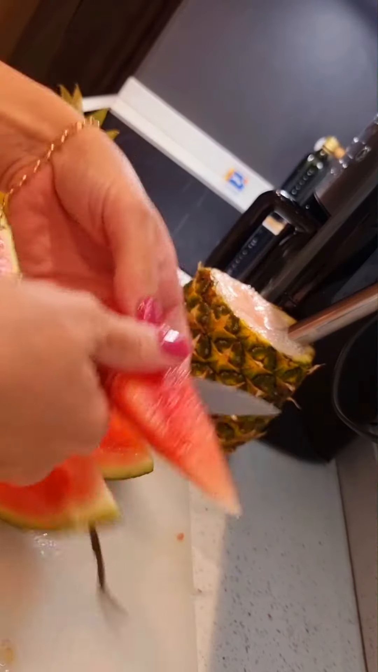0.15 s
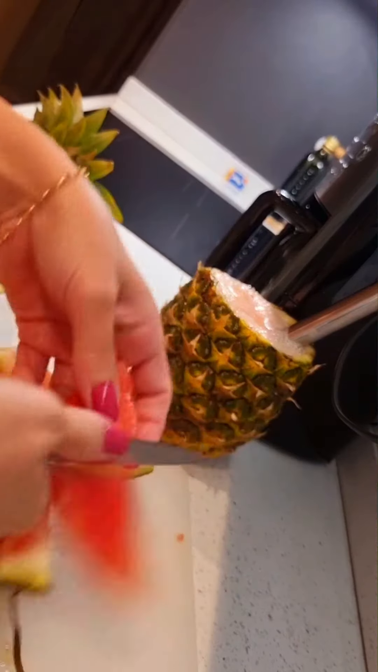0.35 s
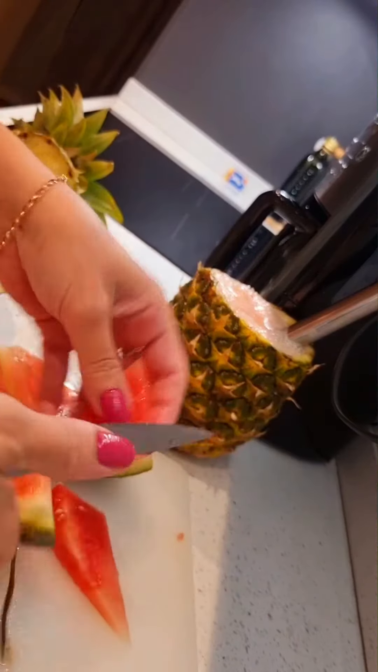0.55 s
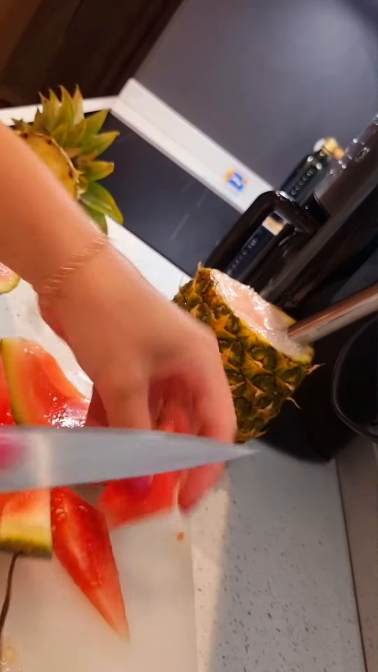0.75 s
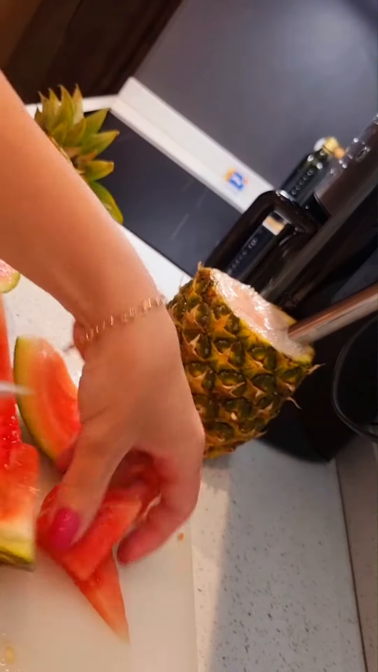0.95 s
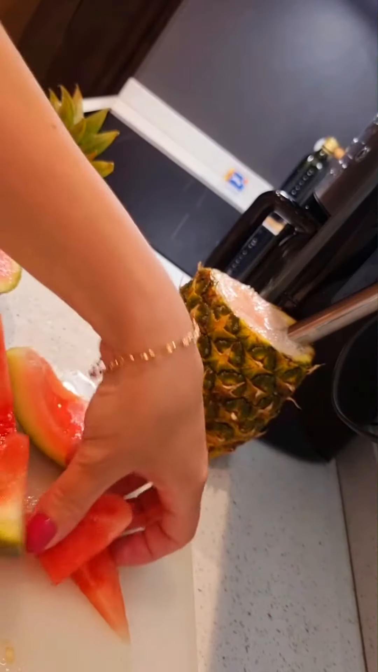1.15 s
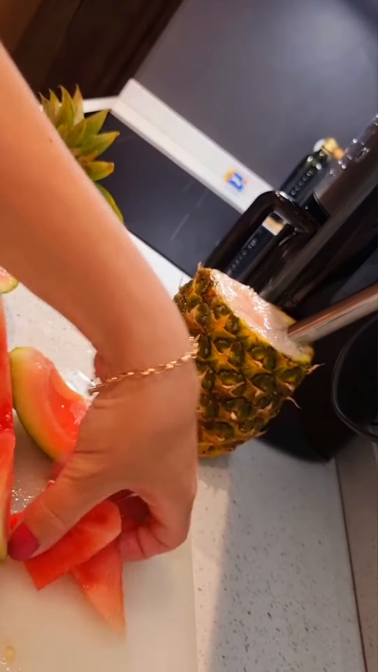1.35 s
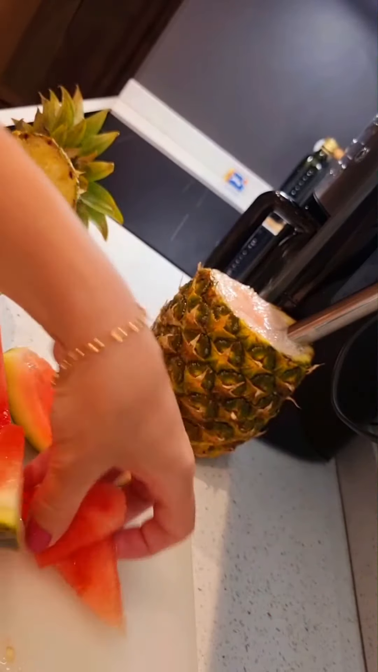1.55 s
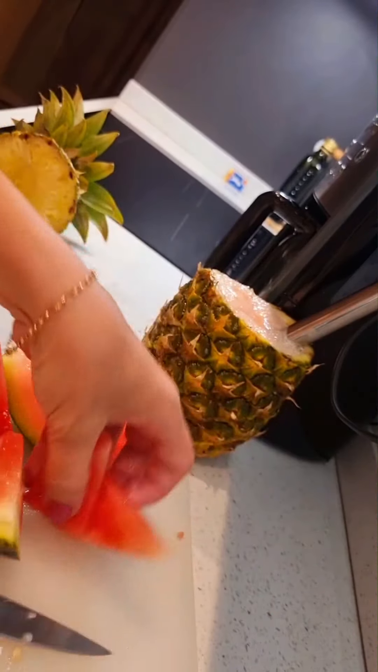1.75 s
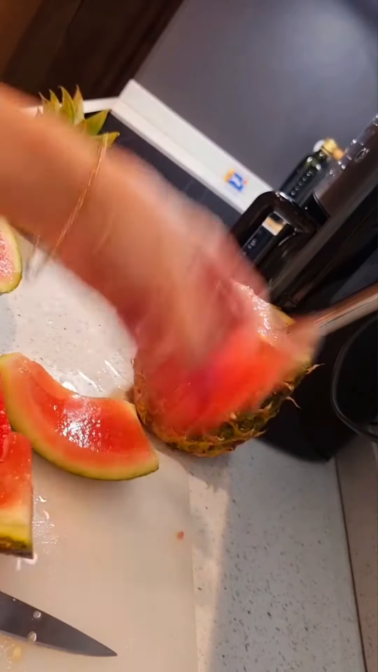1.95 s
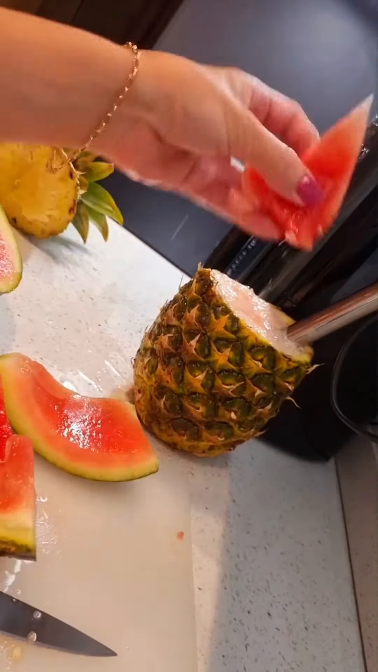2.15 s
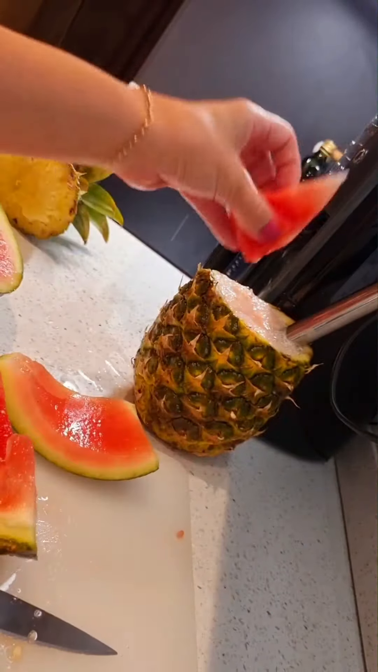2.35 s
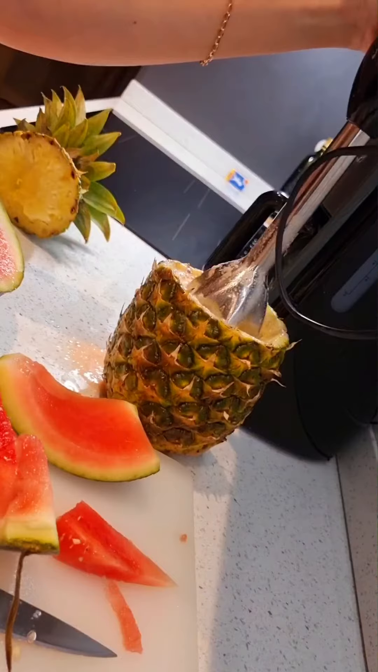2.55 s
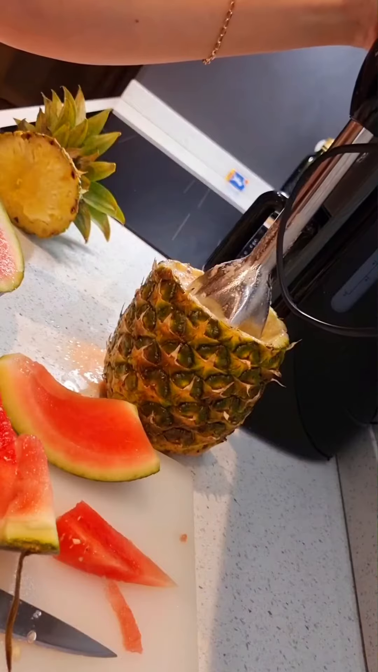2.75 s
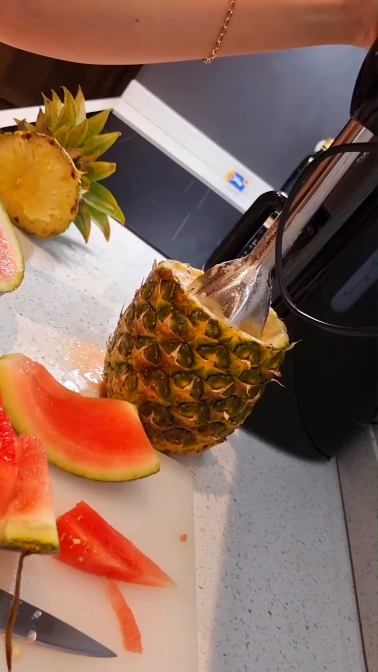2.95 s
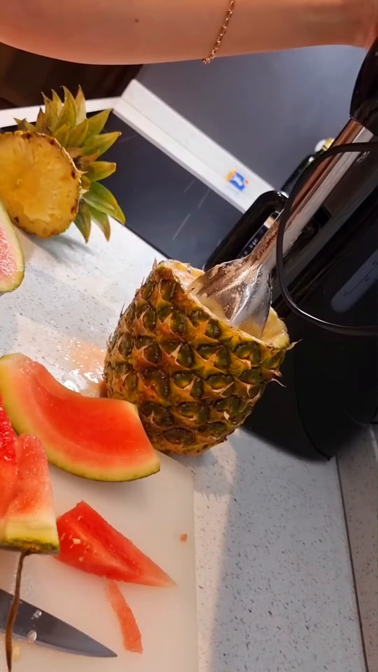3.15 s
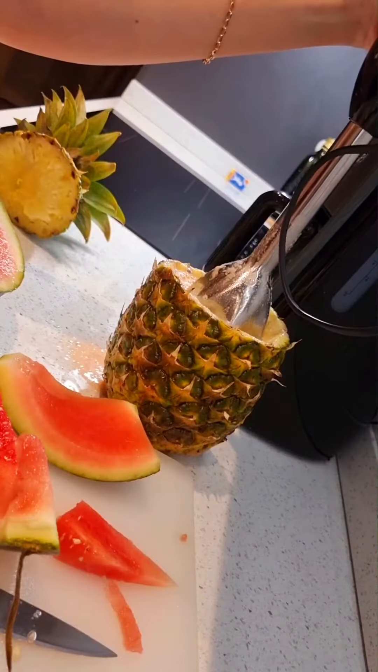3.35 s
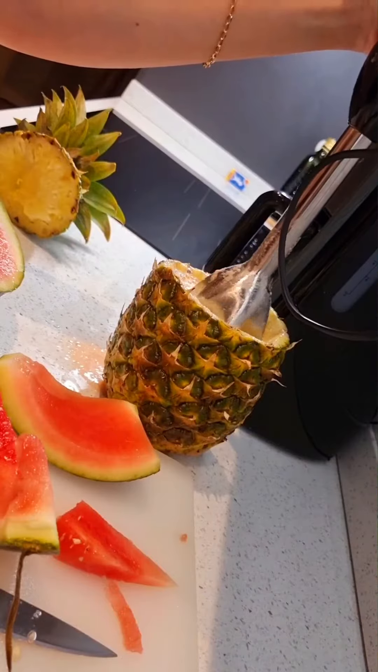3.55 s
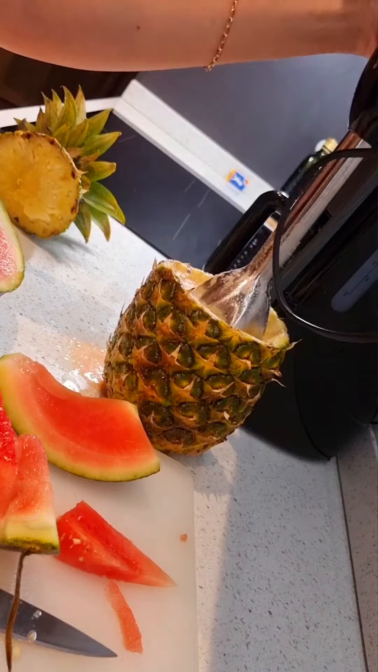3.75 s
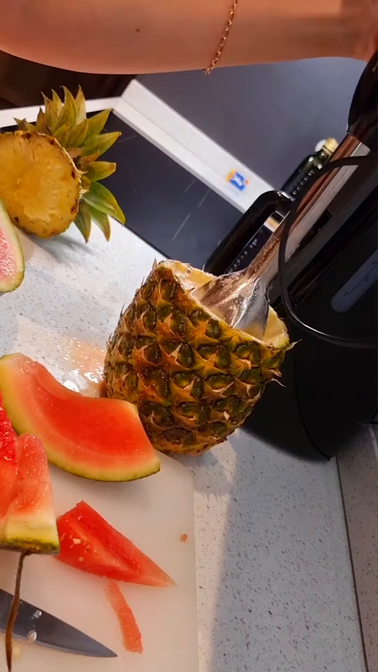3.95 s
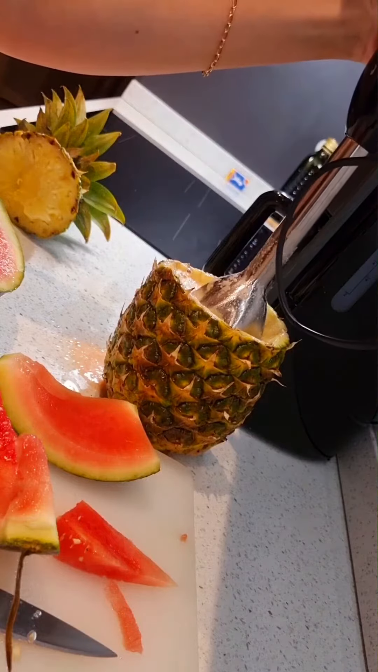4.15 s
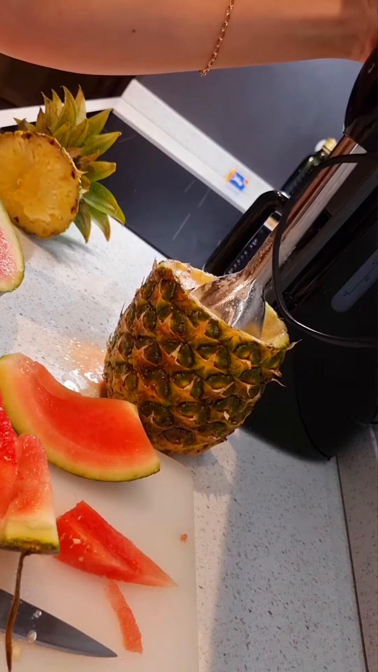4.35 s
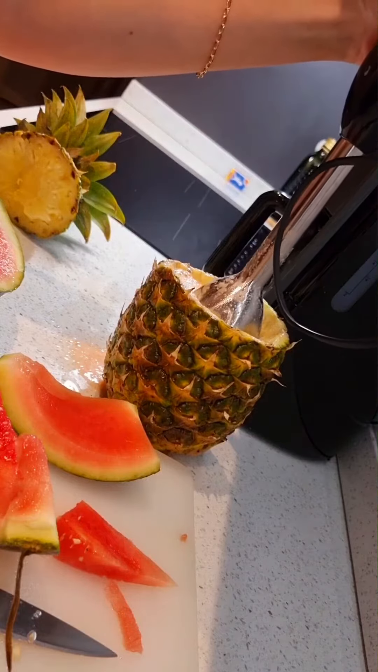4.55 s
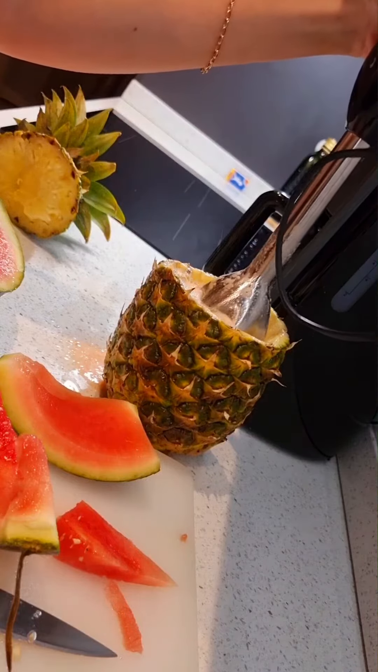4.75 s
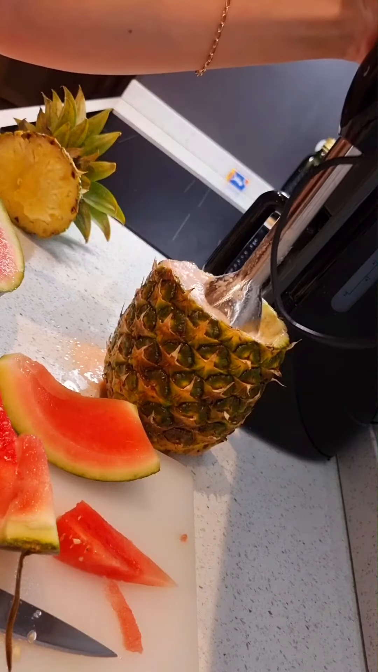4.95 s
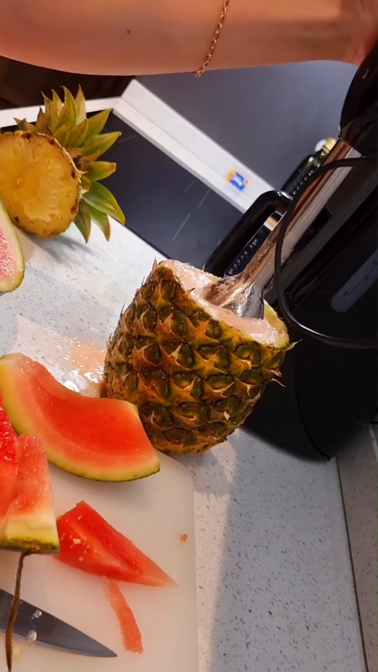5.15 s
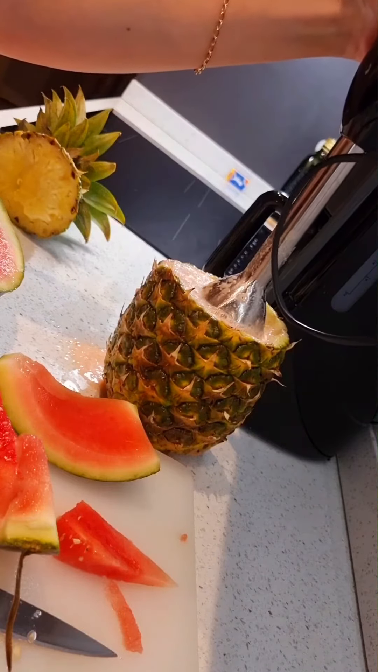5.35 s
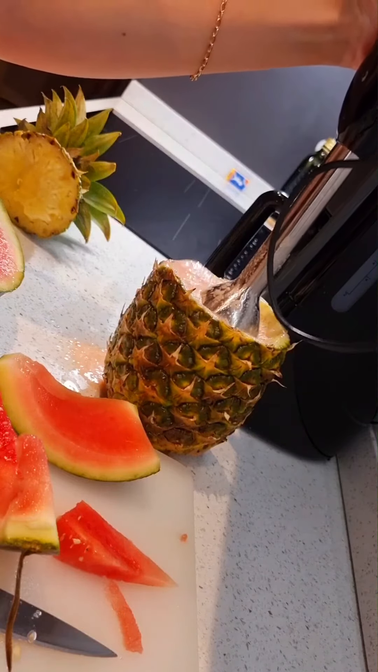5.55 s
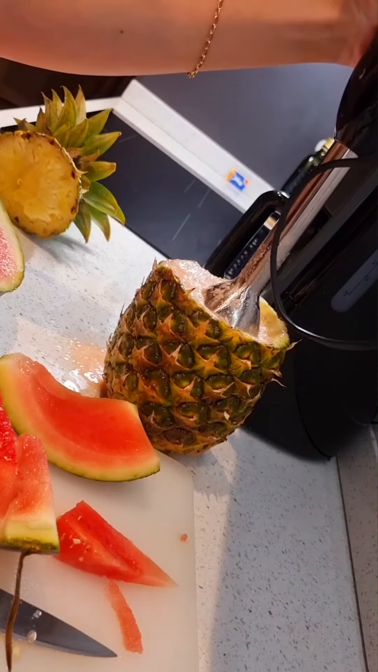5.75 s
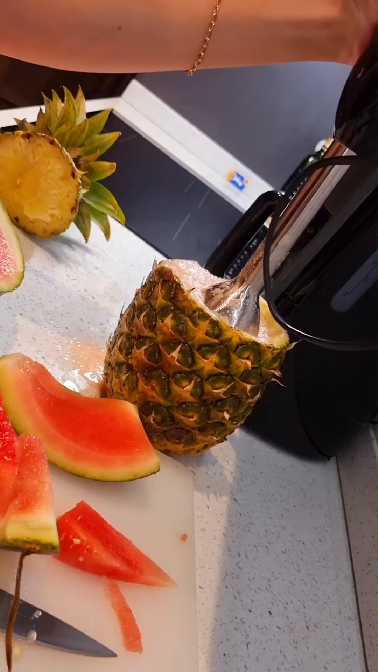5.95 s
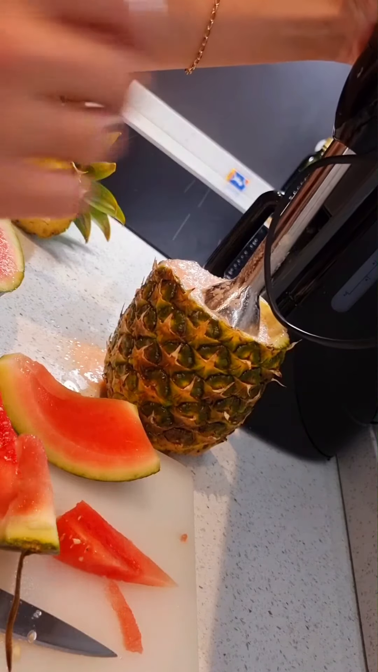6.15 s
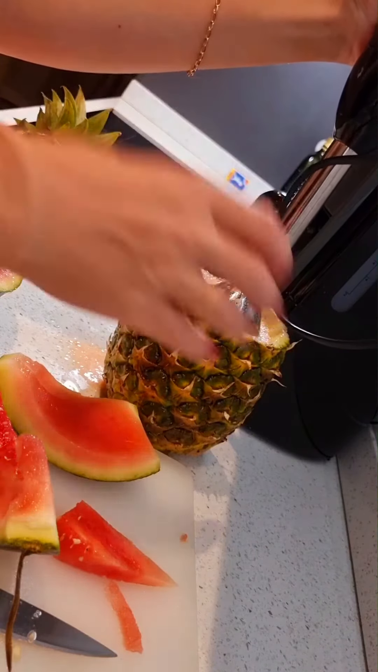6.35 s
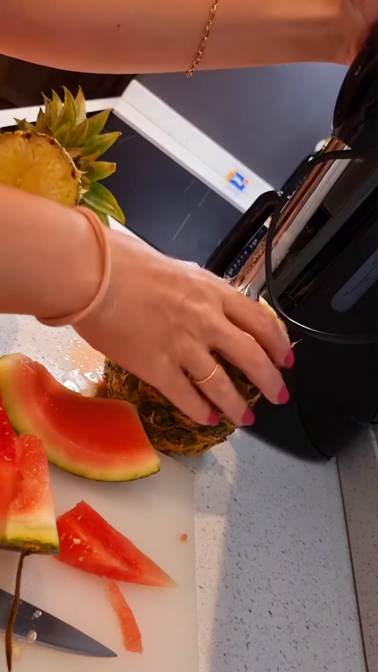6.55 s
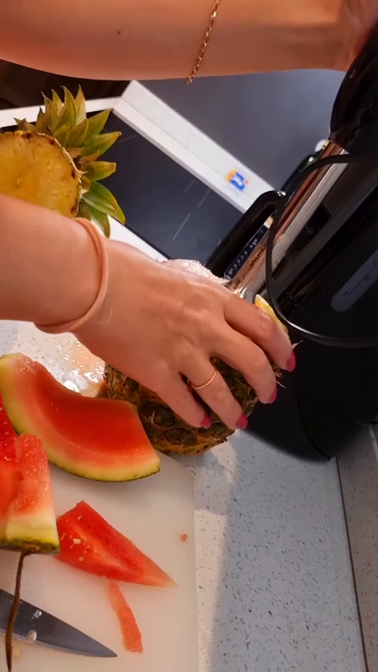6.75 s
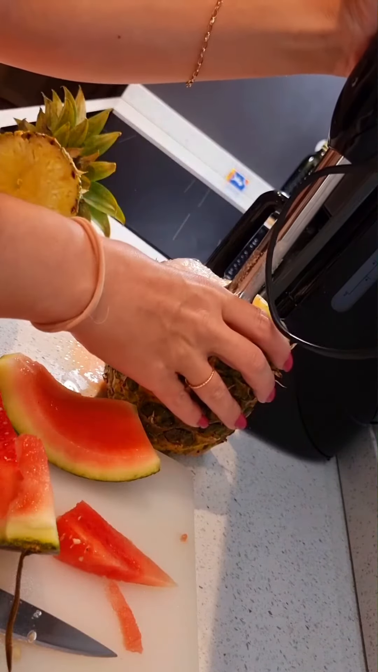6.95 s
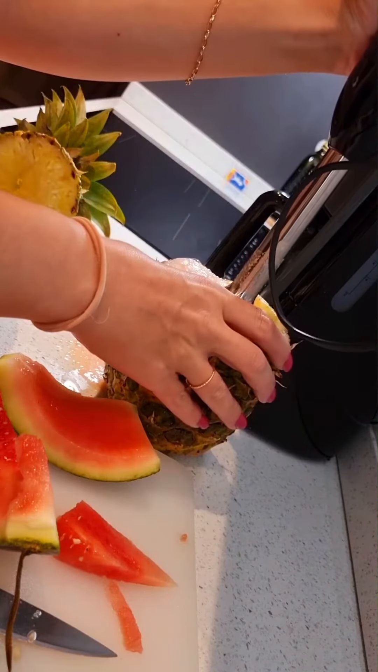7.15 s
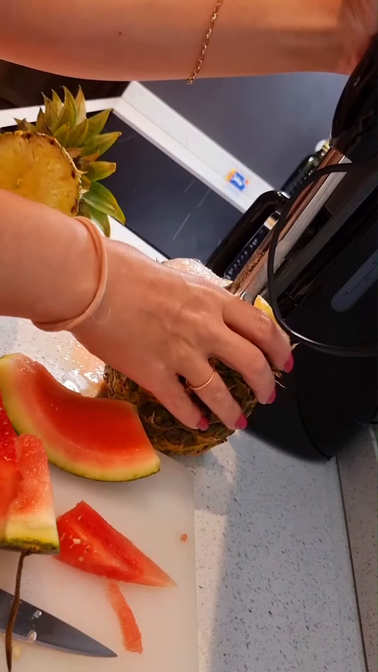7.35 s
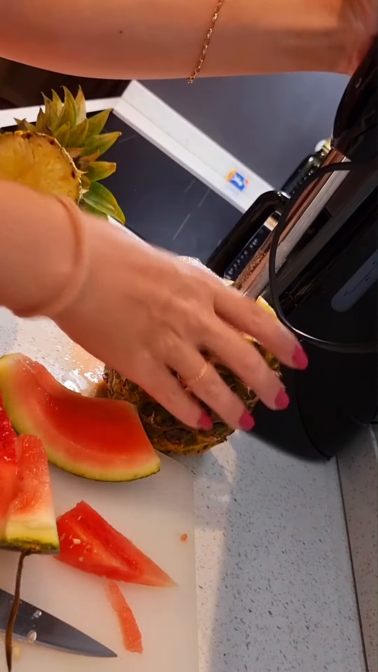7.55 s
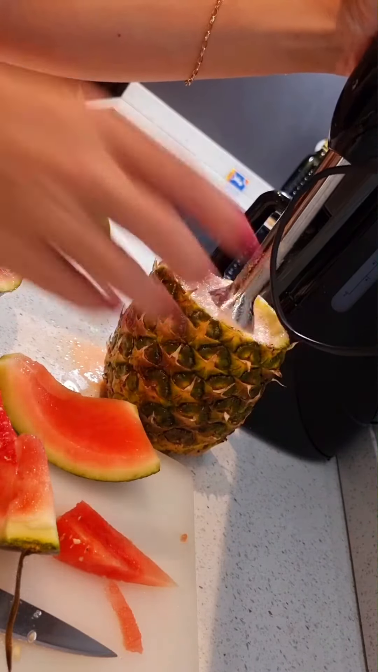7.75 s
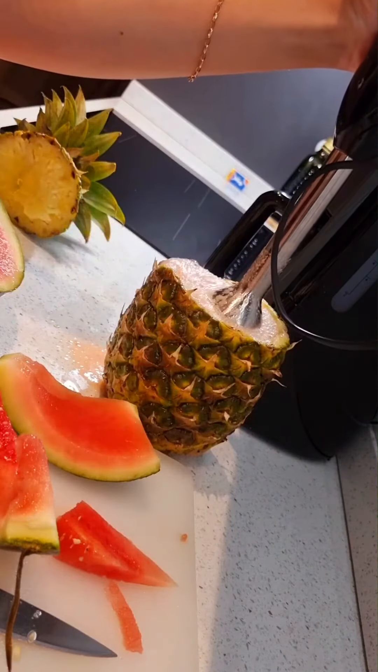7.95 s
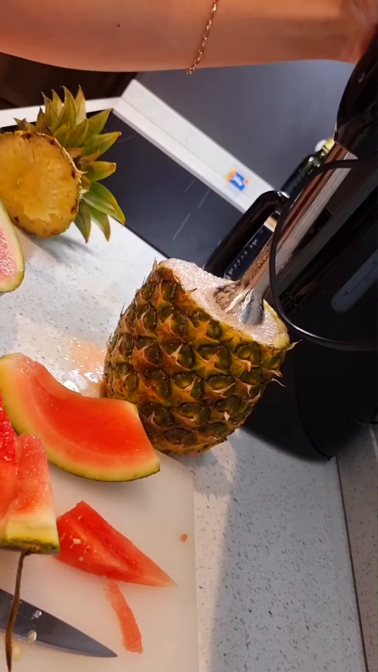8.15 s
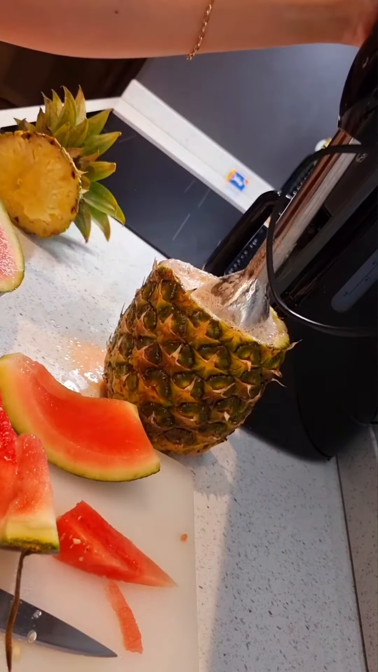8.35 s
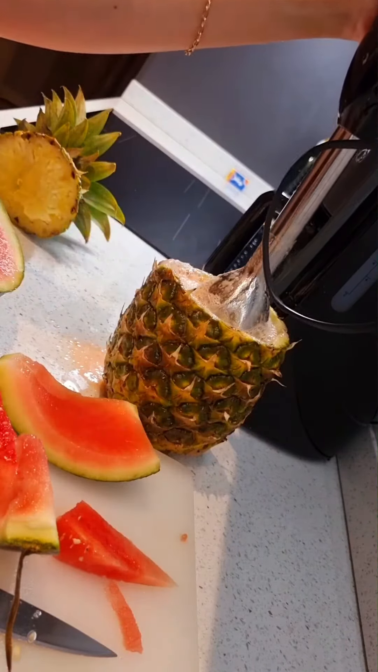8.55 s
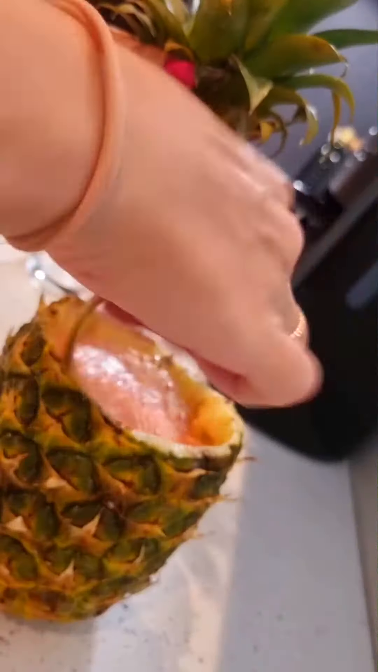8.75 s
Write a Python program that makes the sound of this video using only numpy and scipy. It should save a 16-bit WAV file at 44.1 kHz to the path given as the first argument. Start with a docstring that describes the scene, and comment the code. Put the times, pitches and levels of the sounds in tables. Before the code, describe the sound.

In a small kitchen with a faint low house hum, wet fruit crackles softly under fingers and blade. A knife drops on the board with a sharp clatter. After quiet handling, a hand blender whines up inside a hollow pineapple, bites noisily into chunks and coasts down. Three short wet bursts follow, then soft worktop bumps. Close stereo pickup, leaning left, with short room reflections.

```python
"""A knife slices fruit in a small kitchen while wet pieces crackle and knocks ring the board;
then the knife is put down with a clatter. A hand blender then starts inside a hollowed pineapple:
it hums and whines, bites into chunks, and coasts down as a ring rises in the closing hollow.
Three short bursts churn smooth pulp, and soft bumps on the worktop follow. Curves of rotor speed steer
the blender's sines and noises; blows set decaying tones ringing; the house hums faintly throughout."""
import sys
import numpy as np
from scipy import signal
from scipy.fft import rfft, irfft
from scipy.io import wavfile
from scipy.ndimage import uniform_filter1d

SR = 44100
rng = np.random.default_rng(int(sys.argv[2]) if len(sys.argv) > 2 else 0)


def file_out(sig):
    """Save sig as 16-bit WAV at sys.argv[1]."""
    # one column per channel
    cols = np.atleast_2d(sig).T
    # limit, then scale
    lim = np.clip(cols, -1, 1)
    pcm = np.round(lim * 32767).astype(np.int16)
    wavfile.write(sys.argv[1], SR, pcm)


N = 388080
TIME = np.arange(N) / SR

# when the blender's button is held: pressed_s, let_go_s
PRESSES = [(3.679, 5.109), (6.889, 7.129), (7.35, 7.695), (7.799, 7.947)]
# rotor speed without load, and the speed lost at full load (turns per second)
FREE_HZ, SAG_HZ = 231.4, 43


def from_db(db):
    """Turns decibels into a factor."""
    return 10 ** (np.asarray(db) / 20)


def rms_one(x):
    """Scales a sound to an average strength (rms) of 1."""
    return x / np.sqrt(np.mean(x ** 2) + 1e-20)


def in_time(rows):
    """The columns of a curve at every sample."""
    s, *columns = np.transpose(rows)
    return [np.interp(TIME, s, column) for column in columns]


def at_hz(points, hz):
    """Reads a curve over pitch, with pitch spaced as the ear hears it."""
    f, value = np.transpose(points)
    return np.interp(np.log(np.maximum(hz, 1)), np.log(f), value)


def band(x, low_hz, high_hz, order=2):
    """Keeps the pitches between two limits."""
    edges = [low_hz, min(high_hz, .45 * SR)]
    return signal.sosfilt(signal.butter(order, edges, "band", fs=SR, output="sos"), x + 1e-18)


def colour(x, spectrum):
    """Makes some pitches louder and others softer, following a fixed curve."""
    hz = np.arange(N // 2 + 1) * SR / N
    return irfft(rfft(x) * from_db(at_hz(spectrum, hz)), N)


def drift(rate):
    """Smooth random wandering with rms 1; it is made of waves up to about rate in Hz."""
    coarse = TIME[::20]
    white = rfft(rng.standard_normal(len(coarse)))
    hz = np.arange(len(white)) * SR / N
    slow = irfft(white / (1 + (hz / rate) ** 4), len(coarse))
    return np.interp(TIME, coarse, rms_one(slow))


def resonate(x, modes):
    """Resonances side by side with steep outer edges; white noise roughly keeps its level."""
    out, power = 0, 0
    for k, (hz, width, db) in enumerate(modes):
        r = np.exp(-np.pi * width / SR)
        top = [(1 - r * r) / 2, 0, (r * r - 1) / 2]
        bottom = [1, -2 * r * np.cos(2 * np.pi * hz / SR), r * r]
        # alternate signs keep neighbours from cancelling between their peaks
        out = out + (-1) ** k * from_db(db) * signal.lfilter(top, bottom, x + 1e-18)
        power += from_db(db) ** 2 * np.pi * width / SR
    return band(out, modes[0][0] / 2, modes[-1][0] * 2) / np.sqrt(power)


def impulses(rows):
    """One-sample blows at given times and levels."""
    out = np.zeros(N)
    for s, db in rows:
        out[round(s * SR)] += from_db(db)
    return out


def strike(rows, modes, vary_db):
    """Every blow sets each of an object's natural tones ringing with a strength of its own."""
    out = 0
    for k, (hz, db, ring_s) in enumerate(modes):
        r = from_db(-60 / (ring_s * SR))   # loss per sample
        w = 2 * np.pi * hz / SR
        blows = impulses([(row[0], row[1] + db + vary_db * rng.standard_normal()) for row in rows])
        ring = signal.lfilter([0, np.sin(w)], [1, -2 * r * np.cos(w), r * r], blows + 1e-18)
        out = out + (-1) ** k * ring
    return out


def crack(rows, decay_s):
    """A short burst of dying noise at each contact."""
    t = TIME[:SR // 10]
    burst = rng.standard_normal(len(t)) * np.exp(-t / decay_s)
    return signal.fftconvolve(impulses(rows), burst)[:N]


def grains(per_s, spread_db):
    """Random tiny clicks of uneven size; rms 1."""
    clicks = (rng.random(N) < per_s / SR) * rng.standard_normal(N)
    return rms_one(clicks * from_db(spread_db * np.clip(rng.standard_normal(N), -2, 2)))


def swells(rows, attack_s, release_s):
    """Each event rises just ahead of its start, holds for its length and dies away."""
    out = 0
    for s, length, db in rows:
        rise = np.clip(1 + (TIME - s) / attack_s, 0, 1)
        fall = np.exp(-np.clip((TIME - s - length) / release_s, 0, 20))
        out = out + from_db(db) * rise * fall
    return out


def strokes(rows):
    """Long strokes swell and fade slowly, short ones quickly."""
    rise, fall = 0.34, 0.081   # shares of a stroke's length
    return sum(swells([(s, length, db)], rise * length, fall * length) for s, length, db in rows)


def together(*gains):
    """Unrelated causes add in power."""
    return np.sqrt(sum(g ** 2 for g in gains))


def place(x, pan_db, lead_ms):
    """Two microphones: the left is pan_db louder (softer if negative), the right hears lead_ms later."""
    left = x * from_db(pan_db / 2)
    right = np.interp(TIME - lead_ms / 1000, TIME, x) * from_db(-pan_db / 2)
    return np.array([left, right])


def kitchen(x, early_share, early_s):
    """Dense first reflections from worktop and wall, then a tail that dies band by band."""
    # time for the tail to fall 60 dB: pitch_hz, fall_s
    tail_times = [(150, .35), (600, 0.6), (2000, 0.18), (5000, 0.63), (12000, 0.18)]
    t, edges, response = TIME[:SR * 2 // 3], np.geomspace(60, 18000, 9), 0
    for low, high in zip(edges, edges[1:]):
        tail = from_db(-60 * t / at_hz(tail_times, np.sqrt(low * high)))
        noise = band(rng.standard_normal((2, len(t))), low, high)
        response = response + noise * (tail + early_share * np.exp(-t / early_s))
    response = response * np.clip(t / 0.0011, 0, 1)
    response = response / np.sqrt(np.sum(response ** 2) / 2)
    return signal.fftconvolve(x[None], response, axes=1)[:, :N]


def ambience():
    """A low rumble of the house, shaped from noise, with a faint wavering mains hum."""
    # colour of the rumble: pitch_hz, level_db (per Hz)
    rumble_colour = [(20, -28.5), (35, -22), (50, 4), (100, -5), (140, 0), (190, -8.5), (270, -19.5),
                     (400, -31.5), (900, -29), (1400, -31), (2200, -58.5), (5000, -49.5), (10000, -62),
                     (15000, -56)]
    rumble_db = -50
    shared = rms_one(colour(rng.standard_normal(N), rumble_colour))
    apart = rms_one(colour(rng.standard_normal((2, N)), rumble_colour))
    mains = from_db(-53.0 + 5.2 * drift(4)) * np.sin(2 * np.pi * 100 * TIME)
    # each microphone also has a share of independent rumble, with more of it above 500 Hz
    diffuse = from_db(-12) * apart + from_db(-9.5) * band(apart, 500, 16000, order=1)
    central = from_db(rumble_db) * shared + mains
    return place(central, pan_db=-3.0, lead_ms=0.3) + from_db(rumble_db) * diffuse


def flesh():
    """Juicy cells burst in a fine crackle: bright under the knife, duller under the fingers."""
    # fingers press and lift wet pieces: start_s, length_s, level_db
    finger_strokes = [(.01, 0.41, -69.5), (.578, 0.024, -58.5), (.65, .01, -60.5), (0.895, 0.26, -69),
                      (1.25, .42, -65.5), (2.098, 0.2, -69.5), (2.298, 0.11, -68.5), (3.058, 0.14, -71),
                      (6.33, 0.46, -70.5), (8.64, 0.041, -59)]
    # the blade slices through crisp melon: start_s, length_s, level_db
    slices = [(.32, 0.094, -63), (.468, 0.011, -56)]
    # colour of the wet crackle: pitch_hz, level_db
    finger_colour = [(300, 10), (1200, 3), (3000, 1), (4500, -2.5), (7500, -10), (10500, -21), (15000, -6)]
    # colour of the crisp crackle: pitch_hz, level_db (per Hz)
    slice_colour = [(800, -2), (2000, -9), (2900, 1), (5000, -2), (6000, -4), (7500, -2.5), (10500, -13),
                    (15000, -9)]
    seep_db = -80   # juice goes on seeping between the strokes
    pressing = together(from_db(seep_db), strokes(finger_strokes))
    wet = pressing * rms_one(colour(grains(4100, 4.9), finger_colour))
    wet += strokes(slices) * rms_one(colour(grains(3500, 3.7), slice_colour))
    room = kitchen(wet, early_share=1.8, early_s=0.0053)
    return place(wet, pan_db=-8.5, lead_ms=.1) + from_db(-0.5) * room


def knock(s, db, hardness_hz):
    """A crack and the board's ring: soft, heavy contacts are dull, hard and light ones lack bass."""
    # natural tones of the board: pitch_hz, level_db, ring_s (time to fall 60 dB)
    board_modes = [(264.4, -18, 0.14), (359, -19.5, 0.11), (445.5, -11.5, 0.014), (673, -13.5, 0.048),
                   (973, -9.5, 0.042), (1170, -9, 0.04), (1340, -3, 0.018), (1500, -1.5, .02),
                   (1720, 2.5, 0.0099), (2130, -4, 0.012), (2341, -5, 0.05), (2740, -2, 0.013),
                   (3140, -12, 0.024)]
    blow = from_db(-8) * strike([(s, db)], board_modes, vary_db=1.5)
    blow += from_db(-10) * band(crack([(s, db)], decay_s=0.009), 490, 4900, order=1)
    return band(blow, hardness_hz / 7, hardness_hz, order=1)


def knife_and_board():
    """Knocks ring the board, the blade clinks, buttons click, and the worktop thuds."""
    # knife and fruit knock on the board: start_s, level_db, hardness_hz
    knocks = [(0.582, -31.5, 636), (0.602, -44, 500), (0.653, -49, 895), (1.248, -42.5, 2450),
              (1.255, -44.5, 1960), (1.672, -13.5, 657), (1.7896, -19.5, 1400), (1.815, -15.5, 4997),
              (1.823, -3.5, 4240), (1.831, -22, 11900), (1.9036, -24.5, 3500), (1.9382, -25, 5480),
              (3.081, -38.5, 450), (3.121, -46, 500)]
    # the knife blade touches something hard: start_s, level_db
    clink_rows = [(.9748, -34)]
    # light clicks of the blender's button and of handling: start_s, level_db
    click_rows = [(3.585, -36.5), (3.691, -40.5), (6.059, -56), (6.77, -54), (6.907, -39), (8.653, -48)]
    # dull bumps on the worktop: start_s, level_db
    bump_rows = [(.59, -35.5), (3.085, -28), (3.2, -37), (3.26, -40), (8.65, -28.5), (8.74, -34.5)]
    # natural tones of knife, button and worktop: pitch_hz, level_db, ring_s (time to fall 60 dB)
    knife_modes = [(2510, -12, 0.11), (2830, -10, 0.12), (3050, -6, 0.078), (3320, -4, 0.075),
                   (3650, -2, 0.053), (3690, -4, 0.045), (4160, -11, 0.045)]
    button_modes = [(360, -8, 0.084), (864, -1.5, 0.053), (1360, -3, 0.038), (2120, -10, 0.029),
                    (2260, -9.5, 0.065)]
    worktop_modes = [(60, -7.5, 0.9), (89, 2, 0.19), (115, -9, 0.11), (176.6, -8.5, 0.19)]
    board = band(sum(knock(*row) for row in knocks), 110, 10000)
    # knocks with hardness above 4000 Hz add a very short bright tick at 11 to 16 kHz
    hard = [(s, db) for s, db, hardness_hz in knocks if hardness_hz > 4000]
    tick = from_db(-26) * band(crack(hard, decay_s=.002), 11000, 16000)
    clink = from_db(-7) * strike(clink_rows, knife_modes, vary_db=1)
    clink += from_db(2) * band(crack(clink_rows, decay_s=.004), 2350, 4300)
    clink += from_db(-20) * band(crack(clink_rows, decay_s=0.0026), 4000, 14000)
    # the edge skids on after the touch
    clink += from_db(-10.5) * band(crack(clink_rows, decay_s=0.032), 2300, 3200)
    clicks = from_db(-6) * strike(click_rows, button_modes, vary_db=1)
    clicks += from_db(-5.5) * band(crack(click_rows, decay_s=0.0061), 1300, 3500, order=1)
    bumps = from_db(-6) * strike(bump_rows, worktop_modes, vary_db=2)
    direct = place(board + clink + tick, pan_db=-13.5, lead_ms=0.13)
    direct += place(clicks + bumps, pan_db=-9.5, lead_ms=0.46)
    to_room = from_db(-1.5) * board + from_db(3) * clink + from_db(-7.5) * clicks
    return direct + kitchen(to_room, early_share=1.0, early_s=0.0079)


def rotor():
    """The motor runs up towards a speed set by the load; without power, friction and drag slow it."""
    # drag of the pulp on the blade: time_s, load (0 to 1)
    load_curve = [(4.1, 0), (4.6, .08), (4.87, 1), (5.08, .45), (6.9, 0), (7.1, .2), (7.35, .52),
                  (7.95, .49)]
    spin_up_s = .05   # time constant of the run-up
    # slowing while coasting: steady friction, then drag of air and of a full load at free speed
    friction_hz_per_s, air_hz_per_s, pulp_hz_per_s = 155, 215, 1285
    powered = sum((TIME >= down) & (TIME < up) for down, up in PRESSES) * 1.
    load, = in_time(load_curve)
    step, hz, speeds = 20, 0., []   # speed is worked out every 20 samples
    for on, drag in zip(powered[::step].tolist(), load[::step].tolist()):
        drive = (FREE_HZ - SAG_HZ * drag - hz) / spin_up_s
        brake = friction_hz_per_s + (air_hz_per_s + pulp_hz_per_s * drag) * (hz / FREE_HZ) ** 2
        hz = max(0., hz + (drive if on else -brake) * step / SR)
        speeds.append(hz)
    return powered, load, np.interp(TIME, TIME[::step], speeds)


def orders(angle, table, waver_db):
    """Sines locked to the rotor's turning, each wavering in strength."""
    out = 0
    for k, db in table:
        strength = np.sqrt(2) * from_db(db + waver_db * drift(27.0))
        out = out + strength * np.sin(round(k) * angle + rng.uniform(0, 2 * np.pi))
    return out


def chopping(angle, blade_hz, uneven_db, slosh):
    """The two blade tips slap the pulp once a turn each, with uneven strength, amid sloshing drops."""
    passes = np.diff(np.floor(angle / np.pi), prepend=0)
    passes = passes * np.sqrt(SR / np.maximum(blade_hz, 10))   # same power at any speed above 10 Hz
    slaps = passes * from_db(uneven_db * np.clip(drift(190), -2, 2) - uneven_db / 2)
    mix = (slaps + slosh * grains(2500, 2.0)) / np.sqrt(1 + slosh ** 2)
    return mix * from_db(2.4 * drift(25))


def churn_strength(pace, smooth):
    """Strength of the churning: a curve over time, falling steeply as the rotor slows."""
    # churning at free speed, first whole chunks, later smooth pulp: time_s, level_db
    chunky_curve = [(3.87, -53), (4.01, -44), (4.08, -56.5), (4.5, -49.5), (4.66, -38.5), (4.77, -18.5),
                    (4.94, -17.5), (5.04, -26.5), (5.25, -25.5), (5.8, -29.5)]
    pulpy_curve = [(6.93, -39.5), (7.09, -45.5), (7.2, -32.5), (7.33, -21), (7.48, -20.5), (7.55, -22),
                   (7.69, -21), (7.79, -17.5), (7.85, -21), (7.95, -20), (8.6, -21.5)]
    db = np.where(smooth, in_time(pulpy_curve)[0], in_time(chunky_curve)[0])
    return from_db(db) * pace ** 2.686


def churning(angle, speed, churn, smooth):
    """The same slaps ring the hollow differently when it holds chunks and when it holds pulp."""
    # resonances of the hollow with chunks, then with pulp: pitch_hz, width_hz, level_db
    chunky_hollow = [(105, 50, -2), (191, 88, -4), (274.3, 23, 8), (385, 12, 10.5), (460, 64, 1),
                     (663, 140, 2.5), (764, 160, -3.5)]
    pulpy_hollow = [(260, 92, -9), (377.6, 32, 2.5), (459.4, 16.5, 6), (500.6, 13.5, 7), (610, 100, -4),
                    (776, 42, 0), (976, 33, -4.5)]
    chop = chopping(angle, 2 * speed, uneven_db=6.0, slosh=1.29)
    chunky = from_db(2.5) * churn * ~smooth * resonate(chop, chunky_hollow)
    pulpy = from_db(3.0) * churn * smooth * resonate(chop, pulpy_hollow)
    return chunky, pulpy


def vortex():
    """A narrow, wavering ring that mostly rises as the hollow in the pulp closes."""
    # air rings around the end of the first run: time_s, pitch_hz, level_db
    ring_curve = [(5.05, 1280, -60), (5.13, 1320, -37), (5.2, 1460, -39), (5.3, 1590, -45),
                  (5.38, 1530, -72)]
    width_hz = 40
    hz, db = in_time(ring_curve)
    phase = 2 * np.pi * np.cumsum(hz) / SR
    sounding = (TIME > ring_curve[0][0]) * (TIME < ring_curve[-1][0])
    ring = drift(width_hz) * np.sin(phase) + drift(width_hz) * np.cos(phase)
    return from_db(db) * sounding * ring


def shaft_rattle(angle, speed, pace, churn):
    """The blade's slaps and scrapes on the pineapple's wall make the shaft resonate."""
    # the shaft scrapes on the wall: start_s, length_s, level_db
    scrapes = [(3.8, 0.02, -40.5), (4.45, 0.15, -36.5), (4.69, 0.12, -26), (7.07, 0.17, -31.5)]
    # resonances of the shaft: pitch_hz, width_hz, level_db
    shaft_modes = [(810, 87, -4), (1126, 170, 0), (1347, 130, 4.5), (1493, 103, 3.5), (1750, 420, -6.5)]
    scraping = swells(scrapes, attack_s=0.08, release_s=0.031)
    rattle = together(from_db(-41.5) * pace ** 1.9, from_db(-3) * churn, scraping)
    slaps = chopping(angle, 2 * speed, uneven_db=1.5, slosh=1.9)
    return from_db(3) * rattle * resonate(slaps, shaft_modes)


def brushes_and_spray(angle, powered, load, pace, churn, wet, spatter):
    """Scraping brushes and flung juice ring the housing and hiss."""
    # resonances of the housing: pitch_hz, width_hz, level_db
    housing_modes = [(1760, 140, -2.5), (2380, 270, 16), (2695, 1000, 5), (3260, 320, -17.5)]
    # colour of the hiss: pitch_hz, level_db (per Hz)
    brush_colour = [(400, -20.5), (1500, 9), (3300, -3), (4400, 1), (5500, -0.5), (6500, 1), (7800, -6),
                    (9500, -9), (11500, -8.5), (14000, -7.5), (16000, -18.5)]
    spray = together(spatter, from_db(-20) * churn)   # a share of the churning patters on the wall
    # the starting current adds brush noise, fully set in at 0.35 of free speed
    sparks = from_db(-49) * powered * np.sqrt(np.clip(1 - pace, 0, 1)) * np.clip(pace / .35, 0, 1)
    housing = together(from_db(-41.5) * pace ** 0.99, sparks, from_db(3.5) * spray)
    brush = together(from_db(-40) * pace ** 1.2, sparks, spray)
    # the brushes scrape over twelve commutator bars; juice patters as the churning grows
    uneven = (1 + .5 * np.cos(12 * angle)) * (1 + .2 * np.cos(angle))
    scrape = rms_one(rng.standard_normal(N) * uneven)
    patter = np.sqrt(1 - wet) * scrape + np.sqrt(wet) * grains(6600, 5.5)
    case = from_db(2) * housing * resonate(patter, housing_modes)
    # each microphone's hiss also has a share of independent noise, for a wide, loose hiss
    wide = place(patter, pan_db=-8.5, lead_ms=.41) + from_db(1.5) * rng.standard_normal((2, N))
    hiss = from_db(1.0) * brush * colour(wide, brush_colour)
    # the finest drops from a shredded piece fizz above 9 kHz
    fizz = rms_one(band(grains(5000, 3), 9000, 16000))
    hiss += from_db(-6) * spatter * (1 - load) * fizz
    return case, hiss


def motor_whine(angle, powered, speed, pace):
    """Rotor-locked tones grow with the current, which flows while the rotor is below free speed."""
    # tones under power: rotor_multiple (times the rotor speed), level_db
    powered_orders = [(6, 2), (12, 1), (18, -11), (20, -9), (24, 0), (28, -8), (32, -8), (34, -7), (36, -1),
                      (48, 0)]
    # tones while coasting: rotor_multiple (times the rotor speed), level_db
    coasting_orders = [(24, 3), (36, 1), (48, 4), (60, -3), (72, 3), (96, -4)]
    # the housing rings as each tone sweeps through it: pitch_hz, level_db
    whine_colour = [(600, -26), (1050, -8), (1310, 2), (1430, -5), (1900, -4), (2550, 6.5), (2850, 1),
                    (3500, -4), (4300, -5), (4900, -1.5), (5700, -4), (7200, -2), (8500, -6), (11000, -8),
                    (14000, -24)]
    idle_db, strained_db = -1.5, 2.5
    driven = uniform_filter1d(powered, SR // 30)   # softens each switch of the power
    strain = from_db(np.interp(speed, [FREE_HZ - SAG_HZ / 2, FREE_HZ], [strained_db, idle_db]))
    whine = driven * strain * orders(angle, powered_orders, waver_db=2.5)
    # with the current off, only the tick of the brushes on the bars is left
    whine += (1 - driven) * orders(angle, coasting_orders, waver_db=3)
    # the brushes bounce and roughen the whine
    rough = 1 + .35 * drift(150)
    return colour(from_db(-52.5) * pace ** .75 * whine * rough, whine_colour)


def rotor_tones(angle, speed, pace, churn, shaking):
    """A hum at the rotor speed, strengthened by shaking, and a blade that sings near free speed."""
    # tones of the blade: rotor_multiple (times the rotor speed), level_db
    blade_orders = [(2, -15), (3, 0), (4, -7), (5, -6), (6, -13), (7, -15), (8, -11), (10, -14), (11, -14)]
    blade_db, fade_db_per_hz = -38.5, 1.4
    hum = together(from_db(-41) * pace ** 7.2, from_db(-11) * churn * pace ** 2, shaking)
    tones = hum * orders(angle, [(1, 0)], waver_db=3.0)
    singing = from_db(blade_db - fade_db_per_hz * (FREE_HZ - speed))
    return tones + singing * orders(angle, blade_orders, waver_db=3.5)


def blender():
    """Rotor speed sets tones, pulse rates and levels; the pulp loads the blade and makes it waver."""
    # pieces caught and shredded by the blade: start_s, length_s, spatter_db, shaft_shaking_db
    chunks = [(3.934, .09, -41, -46), (4.771, 0.06, -27, -24.5), (4.859, .2, -28.5, -37.5)]
    attack_s, release_s = 0.029, .022
    powered, load, speed = rotor()
    pace = speed / FREE_HZ
    smooth = TIME > PRESSES[1][0]   # smooth pulp from the second press on
    churn = churn_strength(pace, smooth)
    spatter = swells([(s, length, db) for s, length, db, _ in chunks], attack_s, release_s)
    shaking = swells([(s, length, db) for s, length, _, db in chunks], attack_s, release_s)
    wet = churn / (churn + from_db(-26.5))   # 0 to 1 as the churning grows
    waver = (.0008 + .005 * wet) * drift(35)
    angle = 2 * np.pi * np.cumsum(speed * (1 + waver)) / SR
    chunky, pulpy = churning(angle, speed, churn, smooth)
    shaft = shaft_rattle(angle, speed, pace, churn) + vortex()
    case, hiss = brushes_and_spray(angle, powered, load, pace, churn, wet, spatter)
    whine = motor_whine(angle, powered, speed, pace)
    tones = rotor_tones(angle, speed, pace, churn, shaking)
    direct = place(chunky + tones, pan_db=-2.5, lead_ms=0.26)
    direct += place(pulpy, pan_db=-6.5, lead_ms=0.35)
    direct += place(shaft, pan_db=-9, lead_ms=0.31)
    direct += place(case + whine, pan_db=-10.5, lead_ms=0.386) + hiss
    to_room = from_db(-12.5) * (chunky + pulpy + tones)
    to_room += from_db(-5) * (shaft + case) + from_db(-5.5) * whine
    return direct + kitchen(to_room, early_share=0.65, early_s=0.029)


def scene():
    """House, fruit, knife and blender sound together."""
    return ambience() + flesh() + knife_and_board() + blender()


def record(dry):
    """Peaks are held at full scale, then the treble above 15.7 kHz is cut."""
    low_pass = signal.ellip(10, .2, 80, 15700, fs=SR, output="sos")
    return signal.sosfilt(low_pass, np.clip(dry, -1, 1))


dry = scene()
out = record(dry)
file_out(out)
```